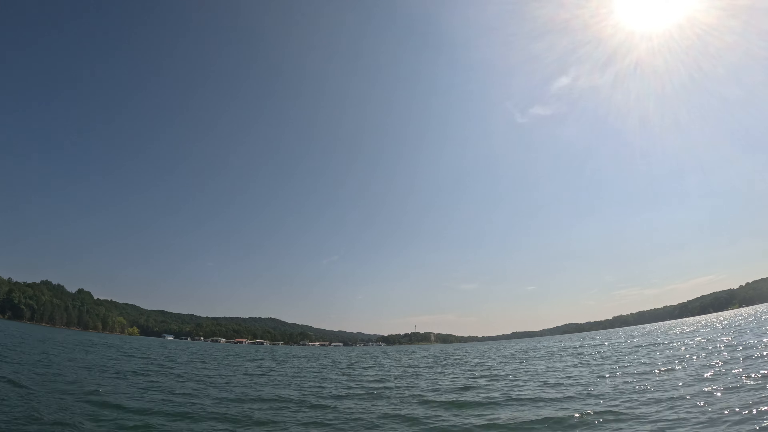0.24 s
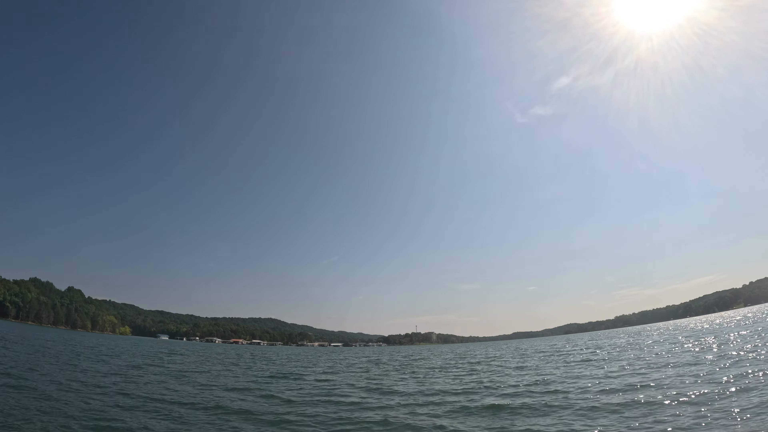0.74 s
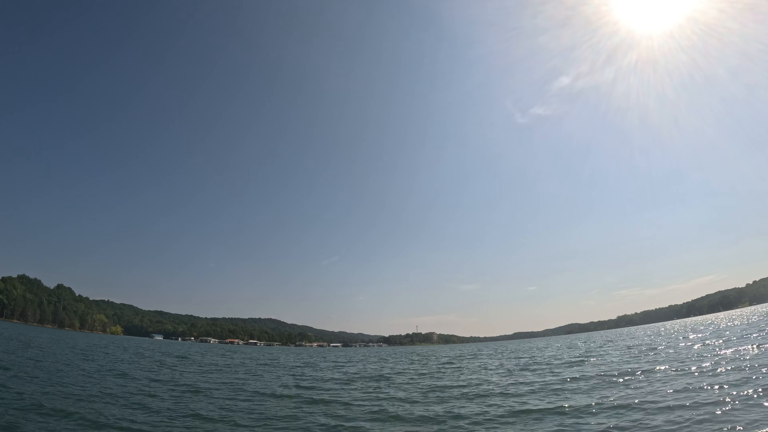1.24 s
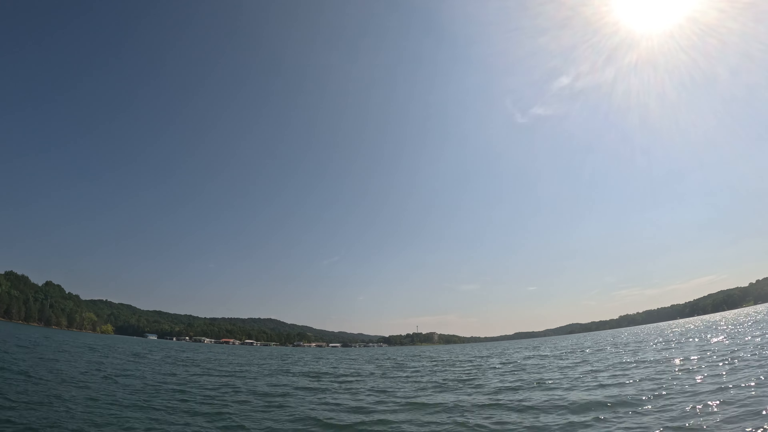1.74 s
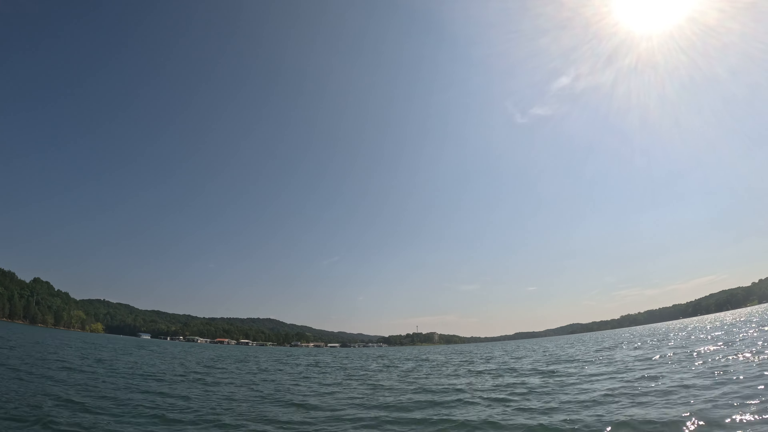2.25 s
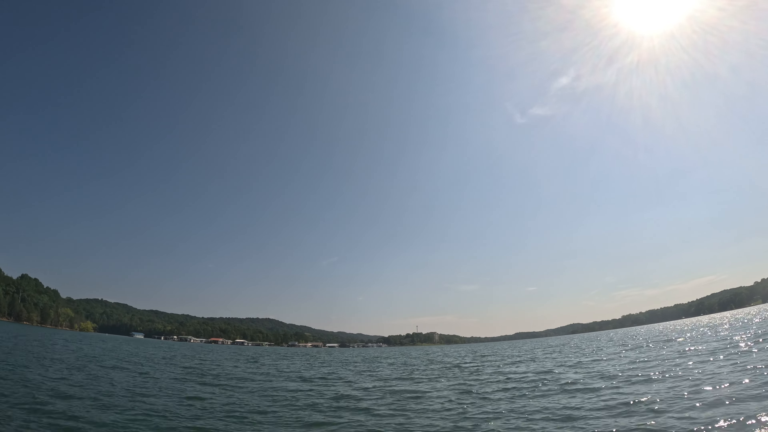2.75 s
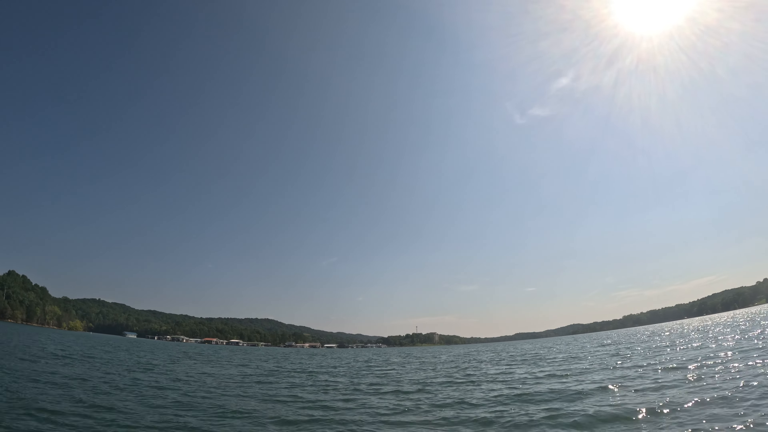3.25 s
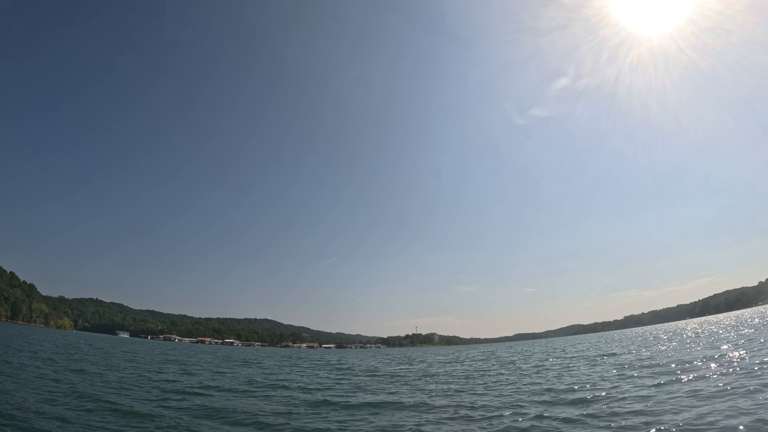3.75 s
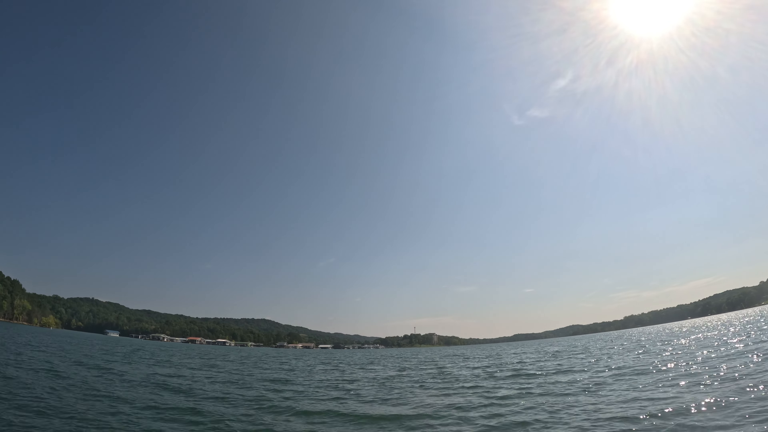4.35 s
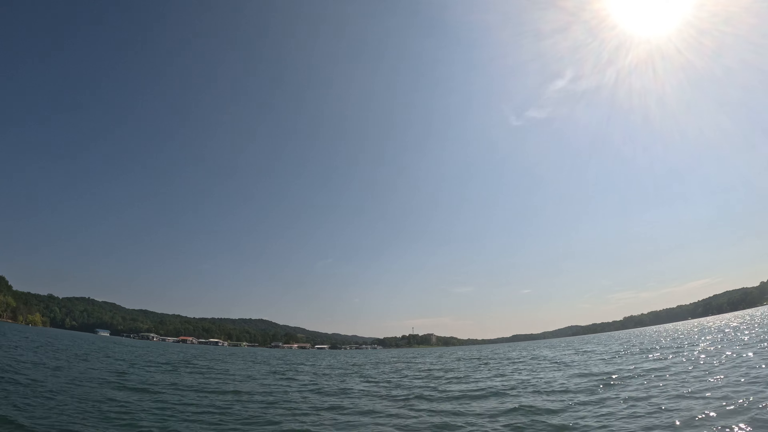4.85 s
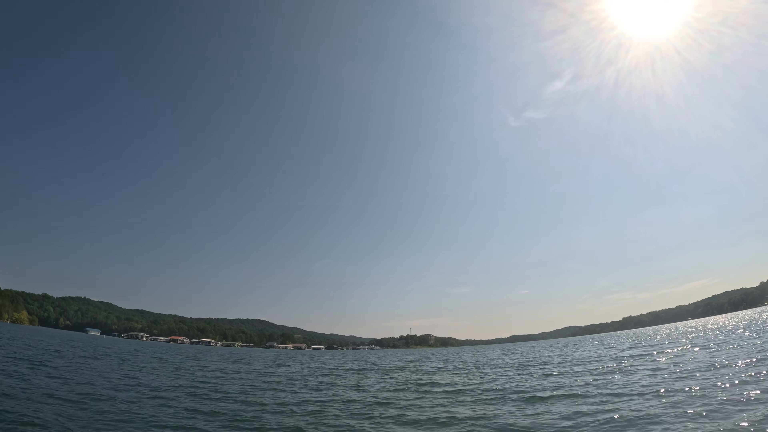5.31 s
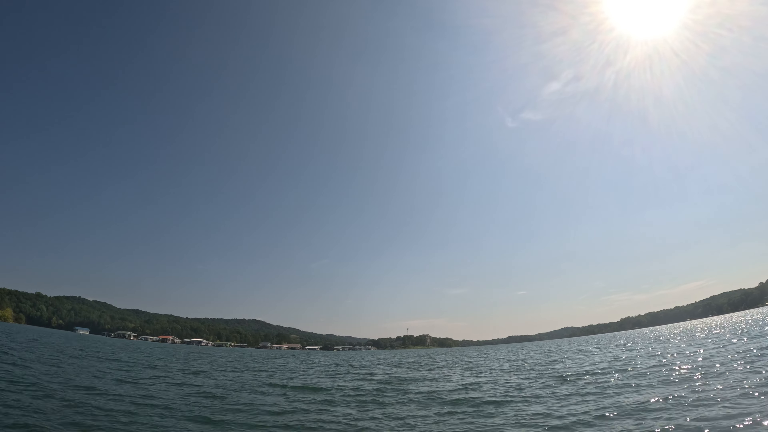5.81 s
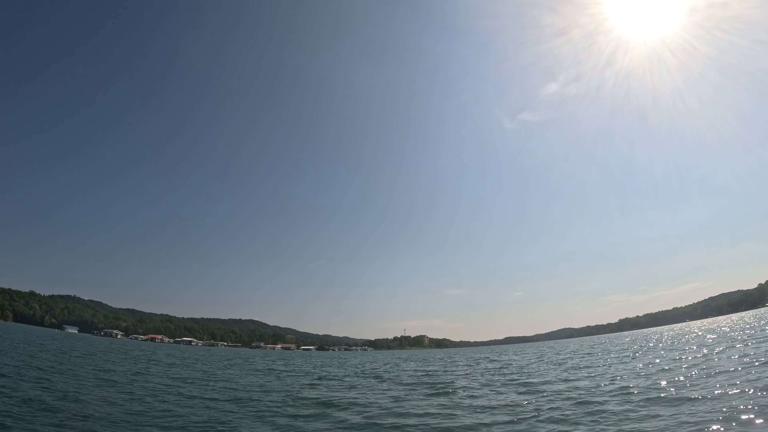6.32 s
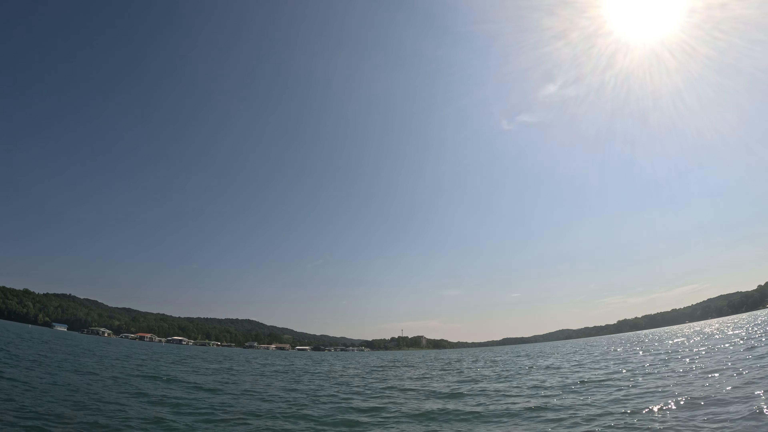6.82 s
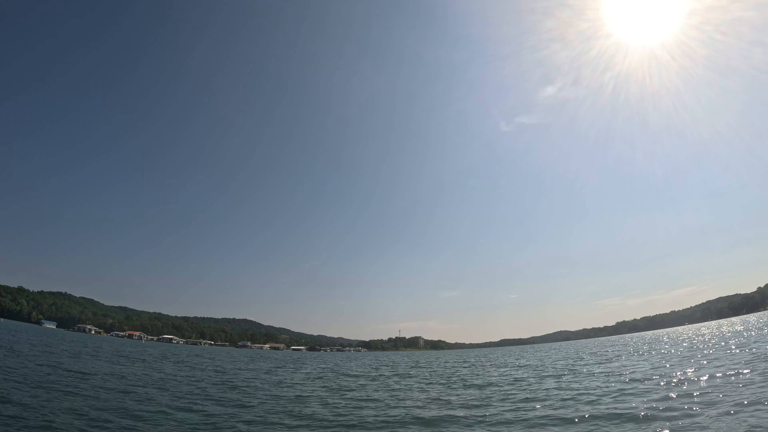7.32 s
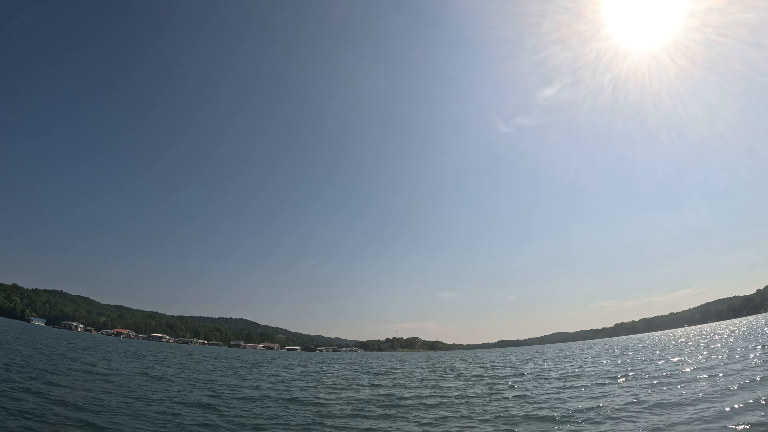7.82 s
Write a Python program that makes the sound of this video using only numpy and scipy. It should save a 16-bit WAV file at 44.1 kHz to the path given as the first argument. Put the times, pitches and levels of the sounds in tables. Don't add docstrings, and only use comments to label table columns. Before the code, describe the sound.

On an open lake, a personal watercraft's buzzing engine hum reaches a deck-mounted microphone through the hull. Water rushes and hisses, wind buffets in low lumps, and spray snaps and hollow water slaps hit close by. The engine eases down in steps, first soon after one second, again past two and five, ending lower with softer spray.

```python
import sys
import numpy as np
from scipy import signal
from scipy.io import wavfile
from scipy.ndimage import uniform_filter1d

SR = 44100
rng = np.random.default_rng(int(sys.argv[2]) if len(sys.argv) > 2 else 0)


def file_out(sig):
    cols = np.atleast_2d(sig).T
    lim = np.clip(cols, -1, 1)
    pcm = np.round(lim * 32767).astype(np.int16)
    wavfile.write(sys.argv[1], SR, pcm)


def voltage_ratio(level):
    return 10 ** (np.asarray(level, float) / 20)


N = 355887

# (time [s], engine cycle rate [Hz], load [dB])
ENGINE = [(0.0, 66.2, 1.5), (0.71, 66.16, 1.8), (1.14, 62.83, -1.1), (1.29, 60.0, -1.2), (1.43, 58.8, 0.2),
          (1.97, 58.7, 0.0), (2.29, 54.75, -0.2), (3.29, 54.3, 1.1), (4.57, 53.6, 1.0), (4.71, 53.15, -1.6),
          (5.14, 49.4, 0.1), (5.43, 46.9, 0.5), (5.6, 46.4, -0.3), (5.86, 46.9, -1.4), (6.87, 46.15, 1.5),
          (7.07, 45.2, 1.5), (7.5, 44.7, -0.3), (8.07, 43.75, -1.9)]


def evened(x):
    return x / np.sqrt(np.mean(x ** 2) + 1e-20)


def column(table, index):
    rows = np.array(table)
    return np.interp(np.arange(N) / SR, rows[:, 0], rows[:, index])


def swells(events, width_s):
    t = np.arange(0, N + 400, 200) / SR
    db = sum(height * np.exp(-((t - s) / width_s) ** 2) for s, height in events)
    return np.interp(np.arange(N) / SR, t, db)


def wander(hz):
    pole = np.exp(-2 * np.pi * hz / SR)
    x = signal.lfilter([1], [1, -2 * pole, pole ** 2], rng.standard_normal(N + SR))[SR:]
    return evened(x - x.mean())


def noise(shape, size, patchy_db, flicker_db):
    frames, hz = 4 * N // size + 5, np.fft.rfftfreq(size, 1 / SR)
    real, imag, patches = rng.standard_normal((frames, len(hz), 3)).T
    patches = uniform_filter1d(patches, size=9, axis=0)
    patches = evened(uniform_filter1d(patches, size=7, axis=1))
    flicker = evened(uniform_filter1d(rng.standard_normal(frames), size=3))
    f, db = np.transpose(shape)
    colour_db = np.interp(np.log(hz + 1), np.log(f + 1), db)[:, None]
    z = (real + 1j * imag) * voltage_ratio(colour_db + patchy_db * patches + flicker_db * flicker)
    return evened(signal.istft(z, nperseg=size, noverlap=3 * size // 4)[1][:N])


def panels_db(hz):
    # (centre [Hz], width [Hz], level [dB])
    hull_panels = [(161.5, 11, -13.5), (203.4, 9.1, 0.4), (218.3, 21, 5.5), (232.8, 35, 2.5),
                   (253.8, 50.5, 6.5), (281.5, 54.6, 3.5), (314.4, 15, 5), (324.3, 13, -1), (333.7, 9.7, 7),
                   (345, 21, 6.5), (358, 8, 1), (386, 16, 1.5), (409, 26, 1), (475, 110, 1.5), (531, 18, 6),
                   (780, 64, -24.5), (885, 50, -2.5)]
    step = hz[::200]
    power = sum(voltage_ratio(db) ** 2 / (1 + (2 * (step - f) / width) ** 2) ** 3 for f, width, db in hull_panels)
    return np.repeat(10 * np.log10(power), 200)[:N]


def engine():
    # (order [1], level at cruise [dB], gain above cruise [dB/Hz])
    hull_orders = [(3, -9, -.5), (4, -23.2, -.3), (5, -44.3, .7), (6, -28.9, -.52), (7, -33.8, .1),
                   (8, -29.8, -.58), (9, -41, -.39), (12, -33, 1.5), (18, -46.5, -.6), (19, -42.5, 0),
                   (20, -41, 0)]
    # (order [1], level [dB])
    air_orders = [
        (2, -37),
        (10, -46),
        (14, -46),
    ]
    # (time [s], level [dB])
    hops = [(.3, -2.5), (.44, -4), (3.59, -4.5), (4.04, -5.5), (5.72, 0), (5.88, -3), (6.04, -1.5),
            (6.63, -2.5), (6.97, -1.5), (7.73, -2)]
    # (time [s], phase swing [rad])
    jolts = [(.38, 1.4), (1, 1.4), (4.07, 2.2), (5.74, 2.7), (5.83, 2.2), (6.03, 1.8), (6.335, 2.5),
             (6.6, 2.1), (6.92, 2.5), (7.05, 2.7), (7.28, 1.5), (7.45, 2.4), (7.6, 1.4), (7.7, 2),
             (7.845, 2)]
    cruise_hz, bounce_hz = 55, 27
    seat_hz, seat_width_hz = 265, 60
    rate = column(ENGINE, index=1)
    load_db = column(ENGINE, index=2) + swells(hops, width_s=0.08)
    bounce = swells(jolts, width_s=.033) * np.sin(2 * np.pi * bounce_hz * np.arange(N) / SR)
    turns = np.cumsum(rate) / SR
    lines = []
    for order, db, slope in hull_orders:
        lines.append((order, db + slope * (rate - cruise_hz) + load_db + panels_db(order * rate)))
    out = np.zeros(N)
    for order, db in [*lines, *air_orders]:
        shake = voltage_ratio(db + .2 * order + 1.4 * wander(hz=9))
        scatter = bounce * np.exp(-((order * rate - seat_hz) / seat_width_hz) ** 2)
        jitter = 0.045 * order * wander(hz=4.0)
        phase = 2 * np.pi * order * turns + scatter + jitter + 2 * np.pi * rng.random()
        out += np.sqrt(2) * shake * np.cos(phase)
    return out


def hull():
    # (time [s], level [dB])
    hull_swells = [
        (1.5, 9.5),
        (3.4, -0.5),
        (5.2, -1.5),
        (5.8, -0.5),
        (7.2, 0.5),
        (7.8, 3),
    ]
    pitch_hz = 26.3 + 1.188 * wander(hz=1.07)
    level_db = -23.5 + swells(hull_swells, width_s=0.25) + 2.5 * wander(hz=1.8)
    return voltage_ratio(level_db) * np.cos(2 * np.pi * np.cumsum(pitch_hz) / SR)


def wind():
    # (frequency [Hz], density [dB/Hz])
    buffet_colour = [(2, -1), (10, 0.5), (18, 1.5), (30, 3.5), (60, 2.5), (100, -2), (160, -5.5),
                     (300, -20.5), (600, -79)]
    # (time [s], level over the mean [dB])
    buffet_swells = [(0, 1.5), (.12, -9), (.33, 4), (1.15, 4.5), (1.38, -2.5), (1.75, 2), (1.88, -0.5), (2.18, 3.5),
                     (2.7, 5.5), (2.93, -11.5), (3.12, 1.5), (3.3, -14), (3.5, 3), (4, 3.5), (4.25, 6), (4.55, 5),
                     (4.75, 3), (5, 4), (5.33, -6), (5.82, 2.5), (6.62, 0), (6.85, -2), (7.35, 3), (7.62, 3.5),
                     (8.05, -4)]
    buffet = noise(buffet_colour, size=4096, patchy_db=1.43, flicker_db=1.5)
    return voltage_ratio(-21 + swells(buffet_swells, width_s=0.081)) * buffet


def splashes(clicks, fade_s):
    # (frequency [Hz], level [dB])
    splash_colour = [(150, -33.5), (500, 1), (1000, 4), (2000, -3.5), (3300, -13.5), (4300, -23.5),
                     (6000, -36.5), (8500, -45), (11000, -59), (14000, -78.5)]
    f, db = np.transpose(splash_colour)
    hz = abs(np.fft.fftfreq(2048, 1 / SR))
    log_gain = np.log(voltage_ratio(np.interp(np.log(hz + 1), np.log(f), db)))
    colour = np.fft.ifft(np.exp(np.conj(signal.hilbert(log_gain)))).real
    colour = colour[:512] * np.hanning(1024)[512:]
    kind, t, out = rng.integers(0, 16, N), np.arange(400) / SR, np.zeros(N)
    for k in range(16):
        envelope = np.exp(-t / fade_s) * np.minimum(3 * t / fade_s, 1)
        shape = np.convolve(rng.standard_normal(400) * envelope, colour)
        out += signal.oaconvolve(clicks * (kind == k), shape / abs(shape).max())[:N]
    return out


def water():
    # (frequency [Hz], density [dB/Hz])
    rush_colour = [(60, -30.5), (130, 2.5), (250, -1), (400, -3.5), (600, -8), (900, -13), (1400, -22),
                   (2500, -42), (5000, -80)]
    hiss_colour = [(500, -23), (1000, -8), (1500, -2), (2050, -4), (2550, -9), (3250, -8), (4300, -19),
                   (5600, -24), (7000, -30.5), (8400, -34), (9800, -46.5), (11300, -42), (12300, -54),
                   (13500, -65.5)]
    # (time [s], level over the mean [dB])
    waves = [(0, 0), (.39, -1), (.5, 2.5), (.88, 2.5), (1, -6.5), (1.12, 7), (1.5, 3), (2, -2.5), (2.15, 0),
             (2.5, 1.5), (2.75, 4.5), (2.88, -1.5), (3.25, 2.5), (3.68, 3), (4, 4.5), (4.12, -3.5),
             (4.25, 8), (4.5, 1.5), (4.75, -0.5), (4.88, 1), (5.62, 1.5), (5.82, 6), (6.05, 0.5), (6.38, 2),
             (6.5, -2), (6.62, 2.5), (7, -1), (7.38, 0), (7.62, 1), (8.06, -3.5)]
    # (time [s], level [dB])
    spray_drift = [(.4, -1.7), (.98, -2), (2.12, -1), (2.75, -0.52), (3.45, 1), (4.08, -2), (4.45, -1),
                   (5.8, -2), (6.55, -1), (6.85, -2.3), (7.2, 0.9), (7.55, -2), (7.9, -2.4)]
    planing_hz, spray_db_per_hz = 56.05, 0.464
    rush_share, spray_share = 0.91, 0.63
    rate = column(ENGINE, index=1)
    gust, wave_db = wander(hz=21.6), swells(waves, width_s=0.11)

    rush_db = -26.5 + rush_share * wave_db + 5.5 + 1.41 * gust
    rush = voltage_ratio(rush_db) * noise(rush_colour, size=1024, patchy_db=-0.2, flicker_db=1.0)

    flutter = voltage_ratio(.9 * np.cos(2 * np.pi * np.cumsum(rate) / SR))
    hiss = flutter * noise(hiss_colour, size=256, patchy_db=1.0, flicker_db=-0.23)
    drops = voltage_ratio(2.2 * np.minimum(rng.exponential(1, N), 3)) * (rng.random(N) < 500 / SR)
    crackle = evened(splashes(drops, fade_s=0.0019))
    settle_db = spray_db_per_hz * np.minimum(rate - planing_hz, 0)
    spray_db = -40.5 + settle_db + spray_share * wave_db + swells(spray_drift, width_s=.07) + 1.0 * gust
    spray = voltage_ratio(spray_db) * (voltage_ratio(3.0) * hiss + crackle)
    return rush * voltage_ratio(1.0 * wander(hz=70)) + spray


def burst(hz, cycles):
    u = np.arange(0, 6, hz / cycles / SR)
    return u ** 2 * np.exp(2 - 2 * u) * np.sin(2 * np.pi * cycles * u + 2 * np.pi * rng.random())


def knocks(table, cycles, lift_db):
    out = np.zeros(N + SR)
    for s, db, hz in table:
        hit = voltage_ratio(db + lift_db) * burst(hz, cycles)
        out[round(s * SR):][:len(hit)] += hit
    return out[:N]


def snaps():
    # (time [s], deck knock [dB], case ring [dB], fizz [dB])
    spray_snaps = [(0.0528, -24, -49, -63), (0.2015, -22, -37, -61), (0.2619, -22, -40, -62),
                   (0.3635, -21, -30.5, -42), (0.437, -25, -40, -61), (0.449, -23, -28, -40),
                   (0.5607, -25, -41, -55), (0.8987, -20, -32, -53), (0.9602, -26, -37, -60),
                   (1.0316, -21.5, -44, -62), (1.0456, -21, -44, -58), (1.1674, -21, -35, -55),
                   (1.2625, -19, -34, -63), (1.3714, -28, -34, -54), (1.38, -23, -34, -59),
                   (1.3948, -24, -49, -61), (1.4307, -16.5, -28, -56), (1.512, -27, -38, -57),
                   (1.57, -20, -30, -53), (1.6947, -24, -44, -61), (1.7216, -26, -37, -54),
                   (1.8658, -24, -47, -65), (1.9055, -23.5, -40, -56), (2.1833, -24, -34, -63),
                   (2.3499, -21, -38, -59), (2.863, -25, -40, -60), (2.9396, -20, -40, -62),
                   (3.0543, -22, -40, -63), (3.084, -24, -50, -59), (3.1039, -37, -43.5, -47),
                   (3.1429, -23, -29, -54), (3.2112, -24, -44, -60), (3.627, -29, -48, -61),
                   (3.7731, -18.5, -43, -61), (3.8458, -27, -29.5, -52), (3.8545, -20, -49, -59),
                   (3.9256, -20, -31, -60), (4.0014, -20, -47, -54), (4.0902, -25, -43, -56),
                   (4.2633, -30, -40, -61), (4.515, -19, -50, -63), (4.7607, -26, -51, -62),
                   (5.8023, -21, -38, -57), (5.8682, -27, -34, -59), (5.945, -26, -46, -65),
                   (6.0488, -30, -44, -56), (6.609, -26, -33, -55), (6.6446, -39, -35, -61),
                   (7.4122, -37, -41, -66), (7.867, -42, -45, -69),
                   (0.1197, -27, -38, -59), (0.1312, -19, -44, -59), (0.2365, -25.5, -38, -52),
                   (0.668, -25, -43, -63), (0.8211, -42, -29, -47), (1.0032, -29, -47, -63),
                   (1.2502, -30, -40, -59), (1.3165, -25, -43, -61), (1.963, -27, -47, -59),
                   (2.3362, -29, -40, -48), (2.5976, -23, -49, -61), (2.6096, -31, -41, -62),
                   (2.7228, -25, -34, -49), (2.849, -30, -44, -61), (2.9104, -30, -50, -59),
                   (2.9303, -27, -42, -57), (2.9852, -32, -39, -63), (3.0695, -33, -43, -60),
                   (3.286, -24, -39, -63), (3.3369, -29, -45, -59), (3.4836, -40, -37, -54),
                   (3.5469, -23, -44, -62), (3.5784, -27, -48, -62), (3.8892, -22, -50, -55),
                   (3.9435, -23, -44, -54), (4.0767, -23, -51, -60), (4.1426, -31, -41, -55),
                   (4.5422, -36, -52, -63), (4.6724, -29, -47, -55), (4.7028, -27, -38, -56),
                   (4.8704, -32, -55, -61), (4.9039, -25, -44, -64), (5.0984, -25, -48, -64),
                   (5.4087, -31, -41, -56), (5.4257, -23.5, -46, -64), (5.6951, -31, -52, -64),
                   (5.7599, -30, -45, -65), (6.0597, -31, -47, -57), (6.1196, -30, -46, -62),
                   (6.1625, -30, -48, -59), (6.4209, -33, -53, -59), (6.4748, -37, -41, -56),
                   (6.5292, -28.5, -46, -65), (6.5835, -29, -53, -65), (6.9063, -28, -49, -61),
                   (6.9342, -42, -44, -55), (7.1004, -31.5, -51, -65), (7.4306, -30, -42, -59),
                   (7.8502, -31, -43, -69), (7.9355, -29, -48, -68)]
    # (frequency [Hz], rise [cycles], lift [dB])
    struck = [
        (1150, .6, 8.0),
        (2950, 1.1, 9.0),
        (5400, 1.7, 6.0),
    ]
    rows = np.array(spray_snaps)
    detune = np.exp(.07 * rng.standard_normal((len(rows), 3)))
    out = np.zeros(N)
    for k, (hz, cycles, lift_db) in enumerate(struck):
        out += knocks(zip(rows[:, 0], rows[:, k + 1], hz * detune[:, k]), cycles, lift_db)
    return out


def slaps():
    # (time [s], peak [dB], centre [Hz])
    hull_slaps = [(0.232, -4.5, 528), (0.355, -1.5, 538), (0.448, -5, 506), (0.954, -3, 530),
                  (1.376, -3, 605), (1.511, -7, 590), (1.566, -6, 575), (1.699, -27, 732), (2.18, -4, 546),
                  (3.21, -20, 608), (3.334, -16, 490), (3.626, -7, 507), (3.668, -19, 540),
                  (3.772, -17, 620), (4.387, -12, 530.4), (4.47, -4.5, 503), (4.702, -3, 526),
                  (5.426, -19, 573), (5.758, -11, 510), (5.833, -19, 896), (5.863, -8, 540),
                  (6.057, -5, 725), (6.119, -11, 670), (6.321, -7, 780), (6.513, -6, 555),
                  (6.674, -27, 600), (6.722, -3, 600), (6.965, -3, 517), (7.425, -3.5, 510),
                  (7.7, -42, 525)]
    return knocks(hull_slaps, cycles=0.99, lift_db=-8.5)


def ticks():
    # (time [s], peak [dB], centre [Hz])
    case_ticks = [(0.4489, -50, 6100), (0.7223, -47, 6100), (0.8215, -39, 6110), (1.7374, -41.5, 6740),
                  (2.2238, -47, 6830), (2.2692, -49, 6300), (2.3351, -40, 6300), (2.6963, -41.5, 6600),
                  (3.1028, -35, 6540), (3.3787, -44, 6050), (3.8287, -42, 6230), (3.8791, -47, 6000),
                  (4.5201, -38, 6250), (6.4752, -51.5, 6167)]
    return knocks(case_ticks, cycles=0.86, lift_db=5.5)


def scene():
    return (voltage_ratio(-1.83) * engine() + hull() + wind() + water() + snaps() + slaps() + ticks())[None]


def top_cut(x):
    return signal.sosfilt(signal.butter(12, 13480, fs=SR, output="sos"), x)


def record(dry):
    power_db = 10 * np.log10(abs(uniform_filter1d(dry[0] ** 2, size=130)) + 1e-12)
    fall = np.arange(N) * 170.0 / SR
    held_db = np.maximum.accumulate(power_db + fall) - fall
    over_db = np.maximum(held_db + 15.5, 0)
    over_db = uniform_filter1d(uniform_filter1d(over_db, size=60), size=60)
    ducked = dry * voltage_ratio(2.5 - 0.62 * over_db)
    ceiling = .8 * np.tanh(ducked / 0.82)
    soft_top = signal.butter(2, 12800, fs=SR, output="sos")
    return top_cut(signal.sosfiltfilt(soft_top, ceiling))


dry = scene()
out = record(dry)
file_out(out)
```